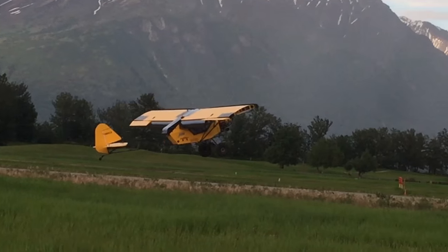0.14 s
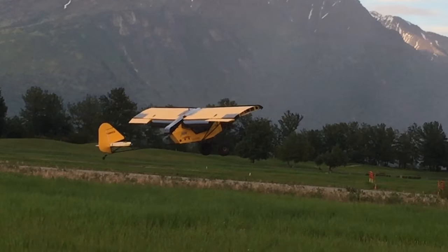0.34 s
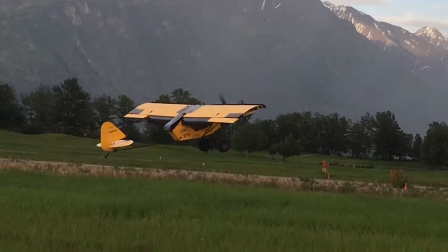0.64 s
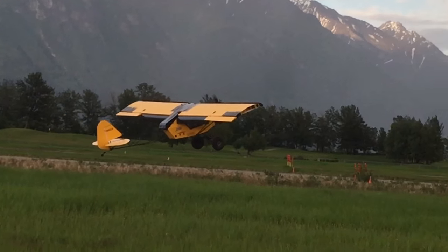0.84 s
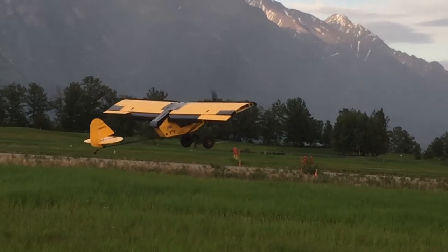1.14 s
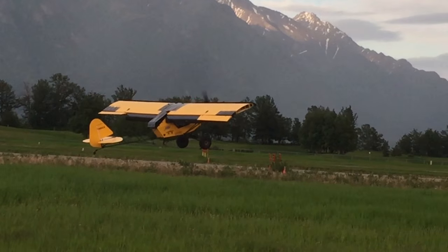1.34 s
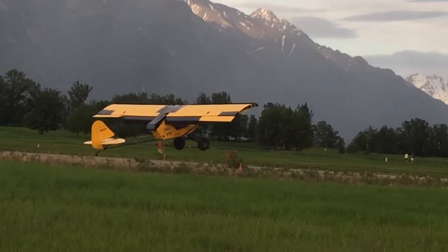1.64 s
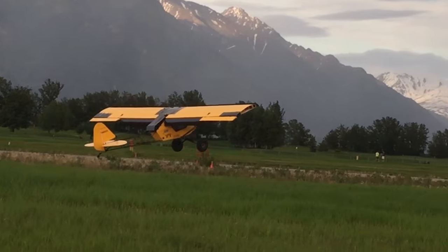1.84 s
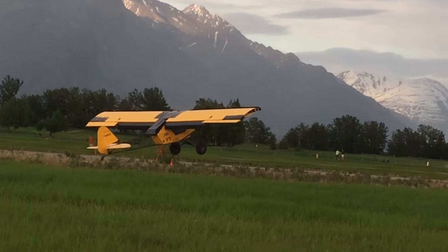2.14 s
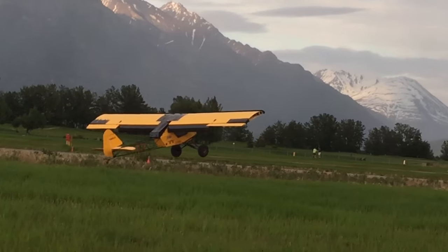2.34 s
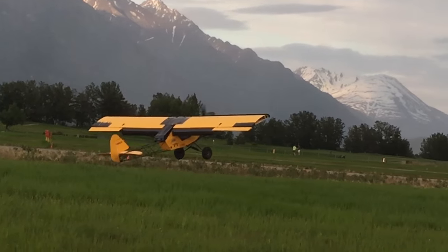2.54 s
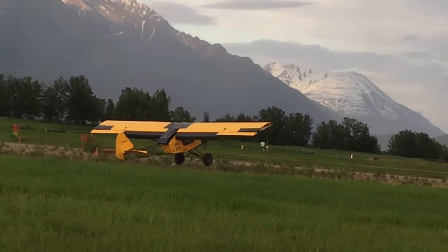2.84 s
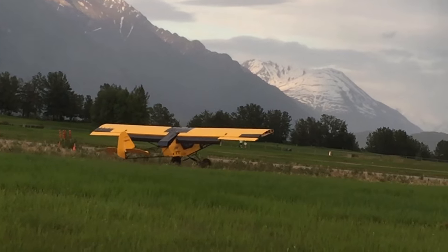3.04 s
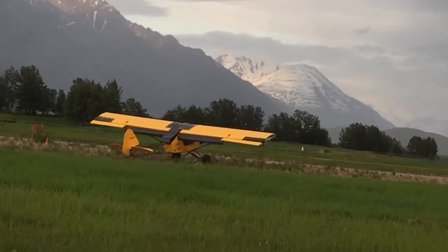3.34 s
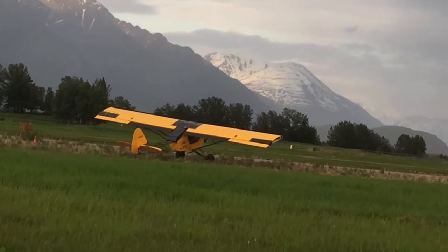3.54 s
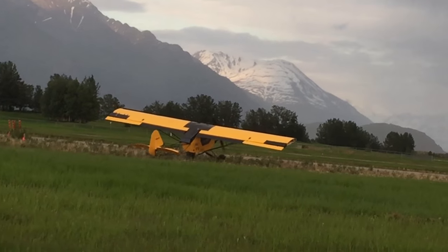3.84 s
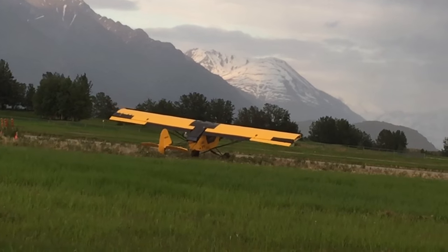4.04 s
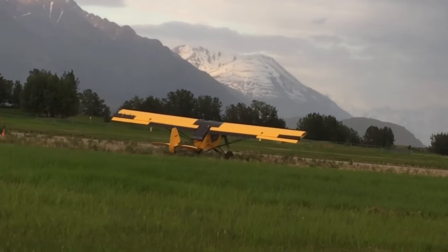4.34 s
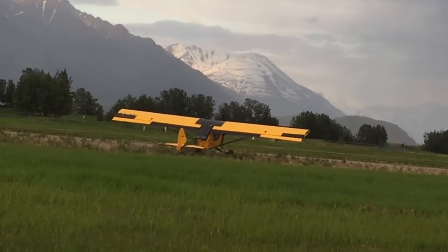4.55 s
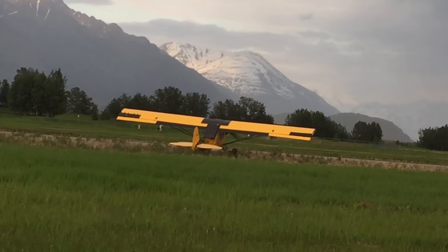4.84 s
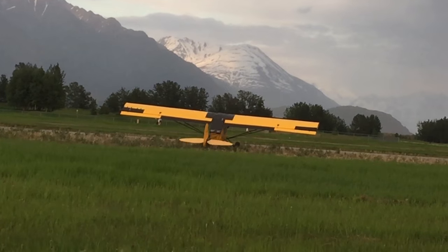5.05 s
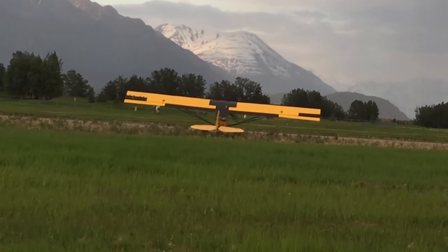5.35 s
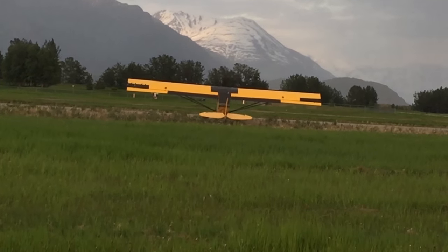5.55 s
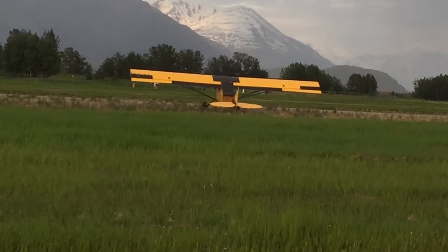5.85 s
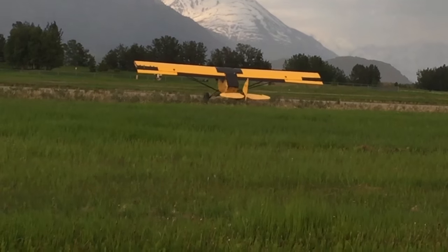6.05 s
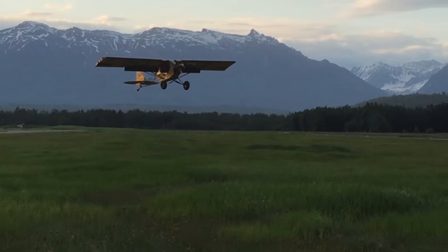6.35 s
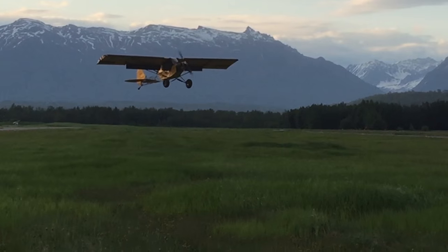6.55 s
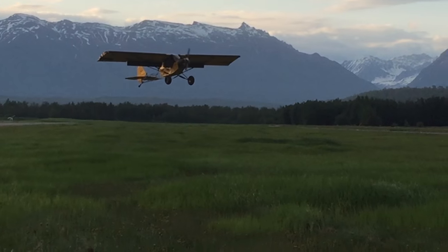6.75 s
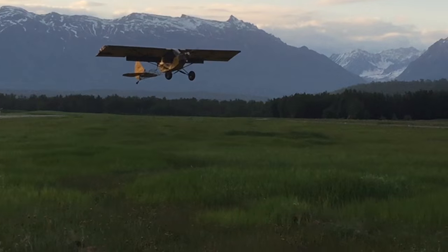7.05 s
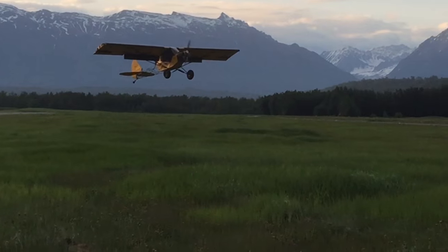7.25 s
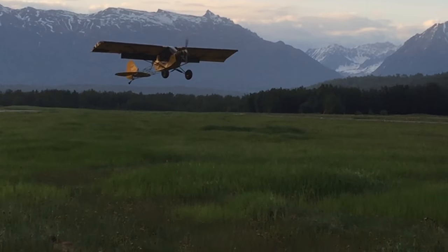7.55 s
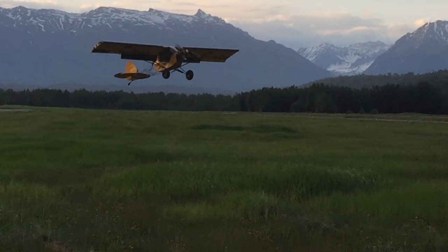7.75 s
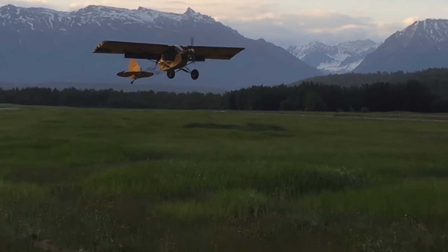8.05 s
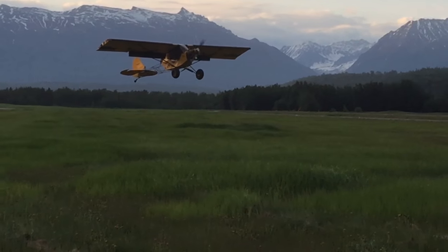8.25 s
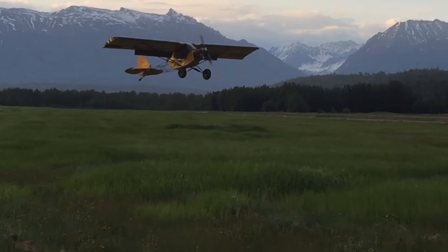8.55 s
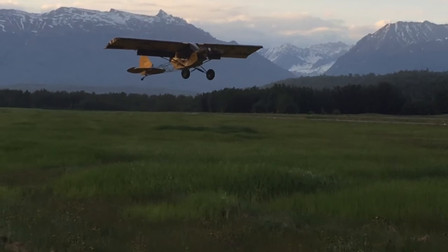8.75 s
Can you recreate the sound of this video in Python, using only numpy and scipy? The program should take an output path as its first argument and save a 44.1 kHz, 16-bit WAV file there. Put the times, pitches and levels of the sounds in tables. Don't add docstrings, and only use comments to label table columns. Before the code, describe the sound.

Mono handheld capture in an open field: heavy low wind slaps and flutter first, over the buzzing drone of a small propeller plane. The engine winds down and recedes to soft separate exhaust beats, a barely audible thin whistle and light gravel ticks, then picks up modestly. Suddenly the sound switches to a nearer pass, steady and buzzy, climbing in pitch into a bright barking roar.

```python
import sys
import numpy as np
from scipy import signal
from scipy.fft import rfft, irfft, next_fast_len
from scipy.io import wavfile

SR = 44100
rng = np.random.default_rng(int(sys.argv[2]) if len(sys.argv) > 2 else 0)


def undo_db(level):
    steps = np.asarray(level, float) / 20
    return 10 ** steps


def wrap_up_sound(samples):
    columns = np.atleast_2d(samples).T
    tamed = np.clip(columns, -1, 1)
    steps = np.round(tamed * 32767).astype(np.int16)
    wavfile.write(sys.argv[1], SR, steps)


N = 392490
T = np.arange(N) / SR
SIZE = next_fast_len(N)
OCTAVE = np.log2(np.arange(SIZE // 2 + 1) * SR / SIZE + 1)
CUT_S = 6.219
CUT = round(CUT_S * SR)
PASSES = (slice(0, CUT), slice(CUT, N))

# time in seconds, exhaust tone in dB, roar in dB,
# muffling behind the airframe in dB.
LANDING = [(0, -44, -36.5, -4.5), (.35, -29.5, -35, 0), (1.2, -35, -39, 1), (2.0, -31, -41.5, 4),
           (2.4, -27.5, -46, 5.5), (3.04, -29.5, -52, 7.5), (3.13, -44, -54, 8.5), (3.25, -36, -57, 6),
           (3.6, -45, -60, 3.5), (4.1, -52, -65, 7.5), (4.55, -39.5, -68, 4), (4.85, -47.5, -68, 4.5),
           (5.15, -35, -64, 7), (5.45, -30, -62, 3), (5.8, -31, -62, 3), (6.21, -31.5, -57.5, -1)]
APPROACH = [(6.228, -35.5, -39, 0), (6.7, -33.5, -38.5, 0), (7.1, -36.5, -37, 0), (7.65, -35, -36, 0),
            (7.899, -37.5, -33.5, 1), (8.25, -33, -28, 1), (8.55, -34, -27, 0.16), (8.9, -43, -30.5, 0)]


def rms_one(x):
    return x / np.sqrt(np.mean(x ** 2) + 1e-20)


def in_time(rows):
    s, *columns = np.transpose(rows)
    return [np.interp(T, s, c) for c in columns]


def per_pass(landing, approach):
    return np.where(T < CUT_S, landing, approach)


def coloured(x, points):
    hz, level_db = np.transpose(points)
    gain = undo_db(np.interp(OCTAVE, np.log2(hz), level_db, -120, -120))
    return rms_one(irfft(rfft(x, SIZE) * gain, SIZE)[:len(x)])


def drift(rate_hz):
    r = np.exp(-80 * np.pi * rate_hz / SR)
    slow = signal.lfilter([1], [1, -2 * r, r * r], rng.standard_normal(N // 40 + 2002))[2000:]
    return np.interp(np.arange(N) / 40, np.arange(len(slow)), rms_one(slow))


def knocks(events, cycles):
    out = np.zeros(N + SR)
    for s, peak_db, hz in events:
        u = np.arange(int(5 * cycles * SR / hz)) * hz / SR / cycles
        swing = np.e * u * np.exp(-u) * np.cos(2 * np.pi * u * cycles - 1.5)
        out[round(s * SR):][:len(u)] += undo_db(peak_db) * swing
    return out[:N]


def by_speed(speed):
    # firings per second, order 1 in dB, order 3 over order 2 in dB, bark over slipstream in dB.
    speed_rows = [(25, -65, 1, 1), (42, -58, -1.5, 6), (46, -40, -1.5, 4), (48.5, -43.5, -2.5, 4.5),
                  (57.2, -23.5, -3.5, 16), (55.7, -50.5, -6.5, -1.5), (60, -26.5, -15.5, 10),
                  (69, -26, -29, 10.5)]
    at, *columns = np.transpose(speed_rows)
    return [np.interp(speed, at, c) for c in columns]


def aircraft():
    # time in seconds, firings per second.
    landing_speed = [(0.0, 52.68), (0.5, 53.09), (0.9, 54.84), (2.0, 52.66), (2.25, 49.07), (2.87, 45.06),
                     (3.14, 42.06), (3.25, 36.39), (3.56, 31.94), (4.03, 26.75), (4.78, 24.67),
                     (4.97, 27.13), (5.2, 32.99), (5.5, 37.53), (5.8, 40.07), (6.21, 41.29)]
    approach_speed = [(6.23, 48.8), (6.87, 49.11), (7.69, 53.04), (7.85, 54.2), (8.29, 62.93),
                      (8.53, 65.82), (8.64, 65.72), (8.9, 61.75)]
    speed, = in_time(landing_speed + approach_speed)
    count = np.cumsum(speed) / SR
    firings = count + np.interp(T, [CUT_S - .004, CUT_S + .004], [.09, -.03])
    out = exhaust_tone(firings, speed) + scattered(roar(firings + .12, speed))
    return out + idle_pops(firings) + whistle(count / 2 + .28)


def exhaust_tone(firings, speed):
    # multiple of the firing rate, level under order 2 in dB.
    landing_orders = [(0.5, -29), (0.75, -26), (1.25, -20), (1.5, -13), (1.75, -20), (2.25, -28),
                      (2.5, -11), (2.75, -23), (3.5, -25), (4, -14), (4.25, -28), (4.5, -28), (5, -16),
                      (7, -28)]
    approach_orders = [(0.5, -38), (1, -9), (1.5, -2), (2, 0), (2.5, -6.5), (3, -2), (3.5, -39), (4, -23.5),
                       (4.5, -23), (5, -11.5), (5.5, -15), (6, -9), (6.5, -27.5), (7, -13), (7.5, -40),
                       (8, -27), (8.5, -56), (9, -45), (9.5, -57), (10, -59)]
    order_lag_cycles = (.22, -.42, .25)
    weak_db, waver_db, wavers_per_s = -7.5, 2.3, 8.0
    notch_hz, notch_width_hz, notch_db = 262, 38, -16
    first_db, third_db, _ = by_speed(speed)
    tone_db = in_time(LANDING + APPROACH)[0]
    out = np.zeros(N)
    for k, level_db in enumerate((first_db, tone_db, tone_db + third_db)):
        phase_cycles = (k + 1) * firings + order_lag_cycles[k]
        out += undo_db(level_db + 0.2 * drift(5.3)) * np.cos(2 * np.pi * phase_cycles)
    for span, orders in zip(PASSES, (landing_orders, approach_orders)):
        for multiple, level_db in orders:
            if multiple in (1, 2, 3):
                continue
            gain_db = tone_db[span] + level_db + weak_db + waver_db * drift(wavers_per_s)[span]
            away = (multiple * speed[span] - notch_hz) / notch_width_hz
            gain_db += notch_db * np.exp(-away ** 2)
            out[span] += undo_db(gain_db) * np.cos(2 * np.pi * (multiple * firings[span] + rng.random()))
    return np.sqrt(2) * out


def roar_levels():
    # time in seconds, rise in dB, half length in seconds.
    surge_rows = [(0.407, 4.5, 0.087), (1.111, 6.5, 0.15), (2.07, 6.5, .15), (5.11, 7.5, 0.17),
                  (6.52, 4.5, 0.15), (7.034, 10, 0.17), (7.794, 3.5, 0.094), (8.54, 6, 0.34)]
    # landing in dB, approach in dB, share of muffling, share of surges.
    share_rows = [(1, -3.5, 0.85, 0.054), (-1.5, -1, -0.11, 0.33), (-11.5, -15.5, -0.00067, 1.0)]
    _, roar_db, muffle_db = in_time(LANDING + APPROACH)
    s, rise_db, half_s = np.transpose(surge_rows)
    bells = np.exp(-((T[::32, None] - s) / half_s) ** 2)
    surge_db = np.interp(T, T[::32], bells @ rise_db)
    return [roar_db + per_pass(a_db, b_db) + muffled * muffle_db + surged * surge_db
            for a_db, b_db, muffled, surged in share_rows]


def roar(firings, speed):
    # frequency in Hz, density in dB per Hz.
    landing_colour = [(180, -41), (300, -11.5), (405, -9), (593, 5.5), (762, -7.5), (900, 4.5), (1170, -7),
                      (1610, -12.5), (2250, -14.5), (4830, -23.5), (6520, -21), (8500, -27), (10600, -41),
                      (14200, -50), (16000, -48)]
    rollout_colour = [(180, -47), (300, -14.5), (367, -28.5), (523, 0.5), (712, -12.5), (955, -7),
                      (1170, -9), (2340, -20), (2770, -18.5), (3600, -23.5), (6180, -35.5), (9520, -50),
                      (12000, -53.5), (15600, -67), (22000, -120)]
    approach_colour = [(180, 11), (300, -19.5), (462, -10.5), (624, -1.5), (762, -11.5), (900, -3),
                       (1660, -2), (2400, -8), (2610, -8.5), (3580, -8.5), (4910, -16), (5430, -2),
                       (6850, -3.5), (11500, -25.5), (16000, -48)]
    edges_hz = (250, 1300, 4800, 17000)
    cracks_db = (-20, -18, -28)
    echo_treble_db = (0, 0, -12)
    hush_per_bark = 0.18
    settle_s = (1.55, 5.8)
    lag_ms = per_pass(np.interp(T, settle_s, (.98, .676)), .912)
    echo_db = per_pass(np.interp(T, settle_s, (-11, -23.5)), -25)

    bark_db = by_speed(speed)[2]
    index, since = firings.astype(int), firings % 1
    shared_db = 1.1 * rng.standard_normal(index.max() + 1)
    shared_db += np.resize((0, -1.5, -.5, -2), len(shared_db))
    receded = np.interp(T[:CUT], [2.5, 3.2], [0, 1])
    shape = undo_db(bark_db) * np.minimum(since / .075, 1) * np.exp(-since / .17)
    hush_db = hush_per_bark * bark_db * np.sin(np.pi * since ** 3.5) ** 2
    cracks = np.diff(index, prepend=0) * undo_db(bark_db + shared_db[index])
    cracks = rfft(cracks * 30, SIZE)
    noise = rfft(rng.standard_normal(SIZE))
    out = np.zeros(N)
    bands = zip(edges_hz, edges_hz[1:], cracks_db, echo_treble_db, roar_levels())
    for low_hz, high_hz, crack_db, dull_db, level_db in bands:
        part = np.zeros(N)
        edges = np.linspace(np.log2(low_hz), np.log2(high_hz), 5)
        width = edges[1] - edges[0]
        for centre in edges[:-1] + width / 2:
            window = np.cos(np.pi / 2 * np.clip((OCTAVE - centre) / width, -1, 1)) ** 2
            strength_db = shared_db + 2.7 * np.clip(rng.standard_normal(len(shared_db)), -3, 1.4)
            strength_db += np.interp(centre, [9, 11.3, 13], [-6, 5, 6])
            flare = undo_db(strength_db)[index] * shape
            stream_power = undo_db(3.25 * drift(19) - 2 * hush_db * min(centre / 11, 1) ** 4)
            part += irfft(noise * window, SIZE)[:N] * np.sqrt(stream_power + flare ** 2)
        in_band = (OCTAVE > edges[0]) * (OCTAVE < edges[-1])
        part = part + undo_db(crack_db) * irfft(cracks * in_band, SIZE)[:N]
        part = part - undo_db(echo_db + dull_db) * np.interp(T - lag_ms / 1000, T, part)
        part = part / np.sqrt(1 + .05 * undo_db(bark_db) ** 2)
        near = coloured(part[:CUT], landing_colour)
        far = coloured(part[:CUT], rollout_colour)
        second = coloured(part[CUT:], approach_colour)
        out += undo_db(level_db) * np.append(near + receded * (far - near), second)
    return out


def scattered(x):
    # lag in ms, wander in ms, wanders per second, level in dB.
    copy_rows = [(2.899, 0.303, 1.31, -12.5), (7.3, 0.332, 2.64, -16)]
    for lag_ms, wander_ms, rate_hz, copy_db in copy_rows:
        late = np.interp(T - (lag_ms + wander_ms * drift(rate_hz)) / 1000, T, x)
        x = (x + undo_db(copy_db) * late) / np.sqrt(1 + undo_db(2 * copy_db))
    return x


def gusts(column, stretch, floor_db):
    # time in seconds, half length in seconds, flutter in dB, rumble in dB.
    gust_rows = [(0.027, 0.022, -15, -43), (.075, 0.056, -19.5, -25), (0.285, 0.037, -18, -32),
                 (0.44, 0.23, -20, -35), (0.654, 0.077, -19.5, -30), (0.802, 0.21, -26.5, -27),
                 (0.967, 0.11, -27, -43), (1.114, 0.024, -23.5, -34), (1.22, 0.24, -31, -27),
                 (1.484, 0.037, -27.5, -40), (1.638, 0.2, -30, -23.5), (2.767, .03, -36.5, -26),
                 (3.355, 0.019, -51, -37), (3.574, 0.051, -46.5, -30), (3.957, 0.028, -46, -58),
                 (4.17, 0.026, -52.5, -48), (4.418, .05, -52.5, -25.5), (4.561, 0.037, -42.5, -27),
                 (5.333, .015, -40, -21), (5.887, 0.032, -59, -30), (6.234, 0.046, -39, -36),
                 (6.696, 0.065, -29, -29.5), (7.1, 0.16, -34, -30.5), (7.735, .08, -39.5, -29),
                 (8.546, 0.14, -28, -21.5)]
    rows = np.array(gust_rows)
    away = np.abs(T[::32, None] - rows[:, 0]) / rows[:, 1] / stretch
    edge_db = 14
    power = undo_db(2 * (rows[:, column] - edge_db * away ** 1.3)).sum(axis=1)
    return 10 * np.log10(np.interp(T, T[::32], power) + undo_db(2 * floor_db))


def wind():
    # frequency in Hz, density in dB per Hz.
    flutter_colour = [(35, -39), (60, 4), (97, -3.5), (156, -1.5), (226, -6.5), (459, -20.5), (612, -34),
                      (700, -45), (910, -21), (1540, -120)]
    rumble_colour = [(20, -46), (32, -12.5), (45, 1), (60, 0.5), (100, 2), (150, -4), (220, -26.5),
                     (400, -77)]
    # time in seconds, peak in dB, pitch in Hz.
    slap_rows = [(0.016, -10, 178), (0.033, 1.5, 183), (0.058, -13, 158), (0.088, -25, 141),
                 (0.297, -10, 167), (0.938, -8, 155), (1.102, -7.5, 170), (2.727, -14.5, 180),
                 (3.331, -34, 174), (3.963, -35, 171), (4.384, -32, 173), (4.523, -26.5, 170),
                 (5.324, -25, 170), (5.894, -45.5, 167)]
    flutter_db = gusts(column=2, stretch=1, floor_db=-69)
    rumble_db = gusts(column=3, stretch=0.65, floor_db=per_pass(-38.5, -40.5))
    eddies = rng.standard_normal(N) * undo_db(flutter_db + 3 + 5.5 * drift(85))
    flutter = coloured(eddies, flutter_colour) * np.sqrt(np.mean(undo_db(flutter_db + 2) ** 2))
    lumps = rng.standard_normal(N) * undo_db(2.2 * drift(12))
    rumble = undo_db(rumble_db) * coloured(lumps, rumble_colour)
    return flutter + rumble + knocks(slap_rows, cycles=0.33)


def field_air():
    # frequency in Hz, density in dB per Hz.
    air_colour = [(150, -34), (250, -26), (273, -5), (375, -5), (455, 6.5), (604, -4), (973, 0),
                  (2350, -28), (3230, -18), (4850, -24), (9310, -20.5), (10700, -29), (17000, -25.5)]
    return undo_db(-63) * coloured(rng.standard_normal(N), air_colour)


def idle_pops(firings):
    pop_hz, pop_db, middle_s, half_s = 496, -49.5, 3.36, 1
    s = T[np.diff(firings.astype(int), prepend=0) > 0]
    peak_db = pop_db - 4.0 * ((s - middle_s) / half_s) ** 2 + 4.3 * rng.standard_normal(len(s))
    return knocks([(a, b, pop_hz) for a, b in zip(s, peak_db) if b > -90], cycles=1.7)


def ticks():
    # time in seconds, peak in dB, pitch in Hz.
    tick_rows = [(3.1482, -52, 6140), (3.7349, -65, 6100), (3.745, -65, 6200), (5.08, -48, 6200),
                 (5.1467, -47, 6600), (5.2096, -49, 6460), (5.274, -60, 6500), (3.104, -43, 1140),
                 (3.802, -49, 1040), (3.95, -64, 1080), (5.994, -48, 1090), (2.2273, -34, 3370),
                 (2.2694, -79, 3430), (5.1153, -57, 3360), (5.1794, -65, 3470)]
    return knocks(tick_rows, cycles=4.2)


def whistle(turns):
    # time in seconds, pitch in Hz, level in dB.
    whistle_rows = [(3.08, 16500, -100), (3.14, 15600, -72), (3.65, 12300, -76), (3.9, 9900, -70),
                    (4.6, 9060, -68), (5.0, 9040, -66), (5.2, 11700, -75), (5.6, 13000, -76),
                    (6.2, 12900, -72)]
    late_s, late_hz, late_db, late_fall_db_per_s, late_width_hz = 6.8, 12000, -59, 37, 300
    hz, level_db = in_time(whistle_rows)
    width_hz = np.clip(380 + .17 * (hz - 9000), 300, 1050)
    hz, width_hz = per_pass(hz, late_hz), per_pass(width_hz, late_width_hz)
    level_db = per_pass(level_db, late_db - late_fall_db_per_s * np.abs(T - late_s))
    offset = turns % 1 - .5
    turn_gain = undo_db(1.5 * rng.standard_normal(int(turns.max()) + 1))
    gate = np.exp(-(offset / .09) ** 2) * turn_gain[turns.astype(int)]
    sweep_hz = hz + width_hz * (0.73 * drift(400) - 3.0 * offset)
    tone = np.sin(2 * np.pi * np.cumsum(sweep_hz) / SR)
    return undo_db(level_db + 4 + 2.5 * drift(170)) * gate * tone


def wheels():
    # time in seconds, half length in seconds, level in dB, low edge in Hz, high edge in Hz.
    scuff_rows = [
        (3.198, 0.11, -51.5, 900, 1570),
        (3.738, 0.0095, -54.5, 1500, 5070),
        (3.806, 0.013, -57, 700, 2700),
        (5.32, 0.32, -65.5, 2400, 4230),
    ]
    out = np.zeros(N)
    for s, half_s, level_db, low_hz, high_hz in scuff_rows:
        grit = rng.standard_normal(N) * undo_db(1.5 * drift(60))
        band = signal.sosfilt(signal.butter(2, [low_hz, high_hz], "band", fs=SR, output="sos"), grit)
        out += undo_db(level_db) * rms_one(band) * np.exp(-((T - s) / half_s) ** 2)
    return out


def scene():
    return (aircraft() + wind() + field_air() + ticks() + wheels())[None]


def band_limit(x):
    return signal.sosfilt(signal.butter(12, 17110, fs=SR, output="sos"), x)


def record(dry):
    rounded = .65 * np.tanh(dry / .65)
    thin = signal.sosfilt(signal.butter(2, 38, "high", fs=SR, output="sos"), rounded)
    mix = signal.sosfilt(signal.cheby2(10, 50, 17250, fs=SR, output="sos"), thin)
    return band_limit(mix)


dry = scene()
out = record(dry)
wrap_up_sound(out)
```